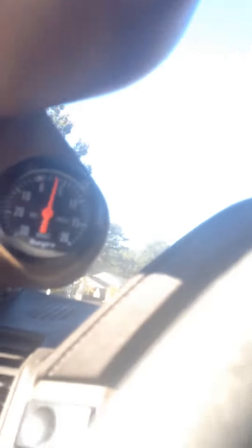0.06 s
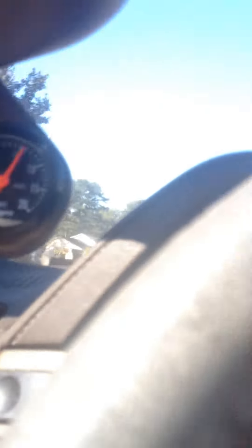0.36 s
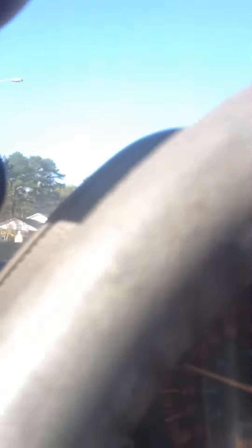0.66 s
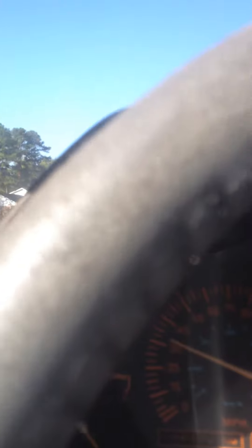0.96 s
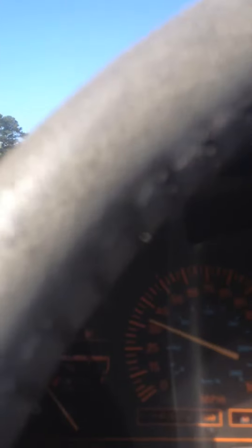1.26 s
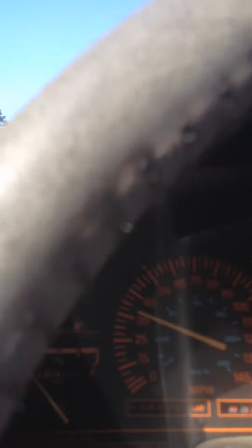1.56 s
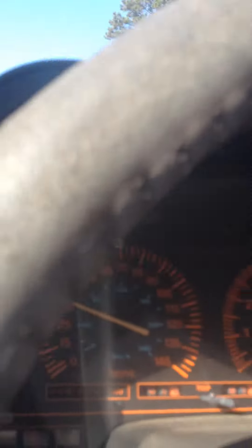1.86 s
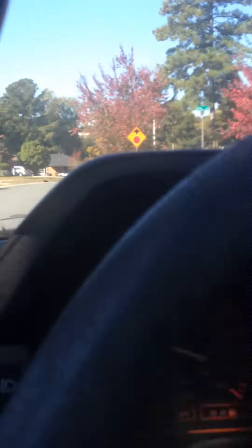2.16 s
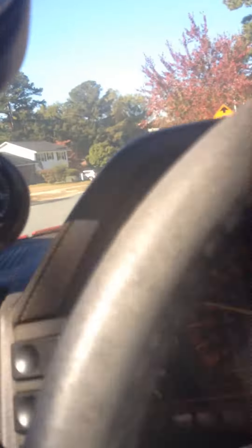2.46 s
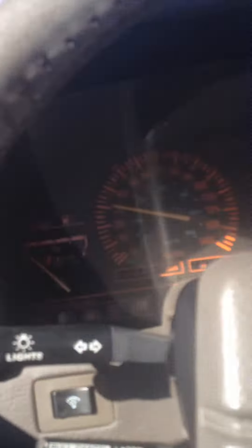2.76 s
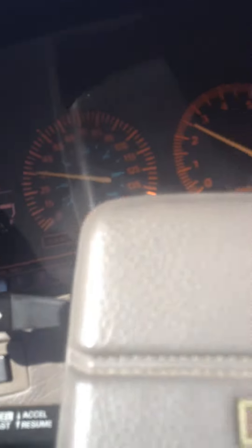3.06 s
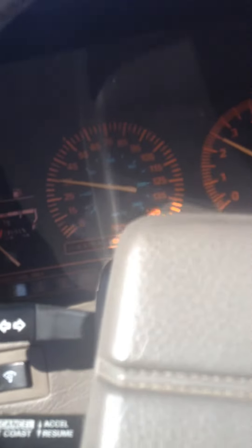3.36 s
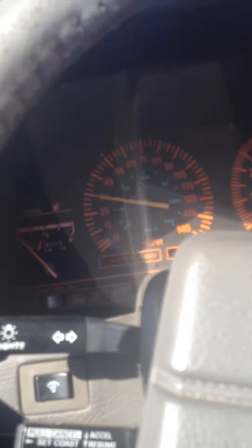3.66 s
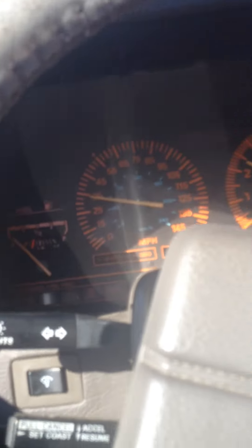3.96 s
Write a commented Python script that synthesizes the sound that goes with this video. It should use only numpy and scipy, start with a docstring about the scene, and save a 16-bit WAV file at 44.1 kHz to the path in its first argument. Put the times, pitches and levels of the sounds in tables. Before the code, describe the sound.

Heard inside the cabin, a turbocharged car engine accelerates briefly with a climbing whine, then lets off with a high, sinking whistle and a fading hiss. A lower drone and road rumble follow, with a few muffled bumps.

```python
"""Inside a turbocharged car. Under load, the engine's firing harmonics boom in the cabin while the
turbo whines upward with its shaft speed. At a gear change the blow-off valve vents with a shrill,
sinking whistle, a sharp click and a long hiss, and late firings thump in the exhaust. The car then
coasts on a lower drone over tyre rumble, with faint ticks; bumps ring the body's modes as dull knocks."""
import sys
import numpy as np
from scipy import signal
from scipy.io import wavfile

SR = 44100
rng = np.random.default_rng(int(sys.argv[2]) if len(sys.argv) > 2 else 0)


def persist_wave(psi):
    """Save psi, clipped to +-1, as 16-bit WAV."""
    counts = np.round(np.clip(psi, -1, 1) * 32767).astype(np.int16)
    wavfile.write(sys.argv[1], SR, np.atleast_2d(counts).T)


N = 176400
T = np.arange(N) / SR


def from_db(db):
    """Amplitude grows tenfold for every 20 dB."""
    return 10 ** (np.asarray(db) / 20)


def rms_one(x):
    """Normalisation to unit mean power."""
    return x / np.sqrt(np.mean(x ** 2) + 1e-20)


def in_time(rows):
    """Linear interpolation of each column of a curve at every sample."""
    times, *columns = np.transpose(rows)
    return [np.interp(T, times, column) for column in columns]


def at_hz(points, hz):
    """Interpolation of a spectrum on a log-frequency axis."""
    freqs, levels = np.transpose(points)
    return np.interp(np.log(hz), np.log(freqs), levels)


def swell(centre, half):
    """A Gaussian envelope, down to 1/e at `half` seconds from its centre."""
    return np.exp(-((T - centre) / half) ** 2)


def drift(rate_hz, step=20):
    """Low-passed noise, drawn every `step` samples, gives a random fluctuation of unit spread."""
    r = np.exp(-2 * np.pi * step * rate_hz / SR)
    slow = signal.lfilter([1], [1, -2 * r, r * r], rng.standard_normal(N // step + 2002))[2000:]
    return np.interp(np.arange(N) / step, np.arange(len(slow)), rms_one(slow))


def phase_of(hz):
    """Phase is the time integral of frequency."""
    return 2 * np.pi * np.cumsum(hz) / SR


def filtered(x, order, hz, kind):
    """A maximally flat filter attenuates what lies outside its passband."""
    return signal.sosfilt(signal.butter(order, hz, kind, fs=SR, output="sos"), x)


def breathy(hz, half_width_hz):
    """Turbulence driving a resonance gives narrow-band noise about its frequency; rms 1."""
    a, b = filtered(rng.standard_normal((2, N)), 3, half_width_hz, "low")
    phase = phase_of(np.broadcast_to(hz, N))
    return rms_one(a * np.cos(phase) + b * np.sin(phase))


def noise(spectrum, flicker_db):
    """Broadband noise as a sum of third-octave bands whose levels flicker independently; rms 1."""
    out, edges = 0, 20 * 2 ** (np.arange(30) / 3)
    white = rng.standard_normal((2, N + 8000))
    for k, (low, high) in enumerate(zip(edges, edges[1:])):
        band = filtered(white[k % 2], 3, [low, high], "band")[-N:]
        db = at_hz(spectrum, np.sqrt(low * high)) + flicker_db * drift(17.6, step=100)
        out += band * from_db(db)
    return rms_one(out)


def ring(force, hz, t60):
    """A damped mode answers each impulse with a sinusoid that falls 60 dB in t60 seconds."""
    r, w = from_db(-60 / (t60 * SR)), 2 * np.pi * hz / SR
    return signal.lfilter([.5, 0, -.5], [1, -2 * r * np.cos(w), r * r], force + 1e-18)


def engine():
    """Source and filter: firing harmonics sweep through the cabin's resonances; the floor hums below."""
    # engine speed: (time [s], firing rate [Hz])
    firing = [(0, 84.14), (.15, 86.95), (.55, 98.6), (.6, 95), (.665, 88.15), (.85, 80.94), (1.02, 71.6),
              (1.24, 63.43), (2.25, 61.51), (3.1, 58.56), (4, 55.9)]
    # engine effort: (time [s], level [dB], roughness [0-1])
    load = [(0, -11, 0.08), (.2, -11, 0.19), (.56, -8, 0.14), (.6, -12.5, 0.1), (.625, -24, 0.6),
            (.73, -30, 0.9), (.79, -20, 0.56), (.82, -21.5, .5), (.87, -15, 0.4), (.92, -23, 0.3),
            (1.08, -19, 0.07), (1.25, -24, 0.01), (2.1, -24.5, 0.34), (2.4, -22.5, 0.17), (4, -25, 0.03)]
    # cabin response: (frequency [Hz], gain [dB])
    cabin = [(90, -10.5), (120, -16), (145, -24.5), (168, 2.5), (195, -0.5), (215, -22.5), (255, -8.5),
             (295, -12.5), (350, -15), (480, -15.5), (600, -25.5), (1200, -36)]
    # floor hum: (time [s], level at the firing rate [dB], level at 4/3 of that rate [dB])
    floor_hum = [(0, -41, -28), (.45, -37.5, -39.5), (.7, -38, -28), (1, -38.5, -57), (1.25, -43.5, -64),
                 (4, -47.5, -55)]
    uneven_db, fall_db_per_octave = -27, 13
    hz, = in_time(firing)
    load_db, roughness = in_time(load)
    firing_db, shake_db = in_time(floor_hum)
    phase = phase_of(hz * (1 + .002 * drift(10)))
    hum = from_db(firing_db) * np.sin(phase) + from_db(shake_db) * np.sin(4 / 3 * phase)
    boom = 0
    for thirds in range(5, 37):
        order = thirds / 3
        db = at_hz(cabin, order * hz) - fall_db_per_octave * np.log2(max(order / 3, 1))
        if thirds % 3:   # uneven cylinders add weak lines between the harmonics
            db += uneven_db / (1 + order / 10)
        angle = order * phase + rng.uniform(0, 2 * np.pi)
        wobble = roughness * order / 4
        partial = (1 + wobble * drift(44)) * np.sin(angle) + wobble * drift(60) * np.cos(angle)
        boom += from_db(db) * partial
    return np.sqrt(2) * (filtered(from_db(load_db) * boom, 3, 85, "high") + hum)


def turbo():
    """A rotor sounds in proportion to its speed: a fluttering shaft whine, with blade tones far above."""
    # turbo spool: (time [s], shaft rate [Hz], whine level [dB])
    spool = [(0, 1490, -50), (.16, 1665, -43), (.3, 1830, -47), (.54, 2040, -46), (.68, 1910, -47),
             (.8, 1680, -43), (.9, 1520, -54), (1.25, 1100, -70)]
    # blade tones: (ratio to shaft rate, half-width [Hz], centre [s], half-length [s], level [dB])
    blade_tones = [(8.0, 650, 0.13, 0.11, -53), (5.62, 400, 0.21, 0.099, -54),
                   (5.97, 290, 0.44, 0.17, -50.5), (5.82, 550, 0.54, 0.065, -43)]
    hz, whine_db = in_time(spool)
    whine = from_db(whine_db) * (np.sin(phase_of(hz)) + .7 * breathy(hz, 35)) * (T < spool[-1][0])
    blades = sum(from_db(db) * swell(centre, half) * breathy(ratio * hz, width)
                 for ratio, width, centre, half, db in blade_tones)
    return whine + blades


def intake():
    """Turbulence in the rushing intake air radiates broadband noise."""
    # intake rush: (time [s], level [dB])
    rush = [(0, -31), (.35, -35), (.55, -30.5), (.62, -37), (.72, -44)]
    # its spectrum: (frequency [Hz], relative density [dB])
    spectrum = [(60, -1), (300, 14), (600, 18.5), (1500, -16), (2500, -3), (4300, -10.5), (5300, -14.5),
                (8000, -13.5), (11000, -11), (13500, -13), (15000, -14)]
    return from_db(in_time(rush)[0]) * noise(spectrum, flicker_db=1.0) * (T < rush[-1][0])


def road():
    """Random excitation: road and wind give a rumble coloured by tyre and panel resonances."""
    # rumble: (time [s], level [dB])
    levels = [(0, -30.5), (.8, -27), (1.1, -30.5), (2.4, -29), (3.2, -31.5), (4, -32)]
    # its spectrum: (frequency [Hz], relative density [dB])
    spectrum = [(25, -31.5), (75, -12), (115, -8), (170, 5), (240, -2), (330, -6.5), (500, -6), (850, -9.5),
                (1800, -19), (2300, -25.5), (3200, -32.5), (5300, -39.5), (15000, -54.5)]
    # tyre and panel resonances: (frequency [Hz], half-width [Hz], level re rumble [dB])
    resonances = [(903, 79, -17.5), (1752, 139, -19)]
    rumble = noise(spectrum, flicker_db=1.26)
    ringing = sum(from_db(db) * breathy(hz, width) for hz, width, db in resonances)
    return from_db(in_time(levels)[0]) * (rumble + ringing)


def air():
    """Flow noise: a faint hiss that peaks as coasting begins."""
    # airy hiss: (time [s], level [dB])
    levels = [(0, -69), (1, -43.5), (1.5, -52.5), (2.4, -60), (4, -76)]
    # its spectrum: (frequency [Hz], relative density [dB])
    spectrum = [(1000, -6.5), (2500, 2), (4300, 7.5), (5200, -9.5), (6500, -0.5), (10000, -8.5),
                (15000, -14)]
    return from_db(in_time(levels)[0]) * noise(spectrum, flicker_db=1.9)


def blow_off():
    """A venting jet: the valve's whistle sinks as pressure falls, and its hiss lingers and dulls."""
    # valve whistle: (time [s], frequency [Hz], level [dB])
    valve = [(.58, 6900, -70), (.612, 6800, -33), (.638, 6680, -30.5), (.662, 6530, -22.5),
             (.71, 6410, -25), (.778, 6320, -28.5), (.79, 6320, -23.5), (.798, 6320, -32), (.84, 6270, -38),
             (.92, 6200, -75)]
    # pipe resonance: (ratio to the whistle, half-width [Hz], initial level re hiss [dB])
    pipe_modes = [(0.99, 420, 1)]
    # vent hiss: (frequency [Hz], relative density [dB])
    spectrum = [(800, -13.5), (1500, 2.5), (2600, 8), (4200, 5.5), (7000, 3.5), (9500, 5), (13000, 4),
                (15000, 0)]
    open_s, attack_s, hold_s, flow_db = .567, .06, .36, -36.5
    flow_fall, pipe_fall, treble_fall = 37, 16, 21   # [dB/s]
    hz, whistle_db = in_time(valve)
    phase = phase_of(hz + 35 * drift(150, step=4))
    tone = np.sqrt(2) * np.sin(phase) * rms_one(1 + .45 * drift(140))
    skirt = from_db(-9) * breathy(hz, 300)
    octave = from_db(-22) * breathy(2 * hz, 450)
    whistle = from_db(whistle_db) * (T < valve[-1][0]) * (tone + skirt + octave)
    age = np.maximum(T - open_s, 0)
    flow = np.minimum(age / attack_s, 1) * from_db(flow_db - flow_fall * np.maximum(age - hold_s, 0))
    pipe = sum(from_db(db) * breathy(ratio * hz, width) for ratio, width, db in pipe_modes)
    hiss = noise(spectrum, flicker_db=1.1)
    dull = signal.sosfiltfilt(signal.butter(2, 8000, fs=SR, output="sos"), hiss)
    treble = (hiss - dull) * from_db(-treble_fall * age)
    return whistle + flow * (pipe * from_db(-pipe_fall * age) + dull + treble)


def side_whistles():
    """The valve's weaker resonances glide down with the pressure; a narrow band of hiss lingers."""
    # whistles: (frequency at the centre [Hz], centre [s], half-length [s], level [dB])
    whistles = [(6850, 0.704, .022, -30.5), (6930, .82, 0.15, -39.5), (5940, .785, .06, -39),
                (6200, .655, 0.037, -41)]
    # last thin hiss: (frequency [Hz], half-width [Hz], centre [s], half-length [s], level [dB])
    last_hiss = (6450, 350, 1.25, 0.7, -59)
    sink_hz_per_s = 2300
    glides = sum(from_db(db) * swell(centre, half) * breathy(hz - sink_hz_per_s * (T - centre), 140)
                 for hz, centre, half, db in whistles)
    hz, width, centre, half, db = last_hiss
    return glides + from_db(db) * swell(centre, half) * breathy(hz, width)


def burble():
    """Impulse response: each late firing after lift-off rings the exhaust's resonance briefly."""
    # late firings: (time [s], relative level [dB])
    pops = [(0.646, -12), (0.751, -14), (.776, -6.5), (.863, -12)]
    exhaust_hz, rise_s, t60_s = 169.7, .00094, .072
    out = 0
    for start, db in pops:
        age = np.maximum(T - start, 0)
        envelope = from_db(db - 60 * age / t60_s) * (1 - np.exp(-age / rise_s))
        out -= envelope * np.sin(2 * np.pi * exhaust_hz * age)
    return filtered(out, 2, exhaust_hz / 2, "high")


def ticks():
    """Broadband transients: one sharp click during the valve's whistle, then faint ticks while coasting."""
    # short bright ticks: (time [s], relative level [dB])
    onsets = [(0.792, -17), (1.5449, -28.5), (1.5783, -28.5), (1.78, -27.5), (2.0503, -31.5),
              (2.3935, -31.5), (2.7473, -32.5)]
    # their spectrum: (frequency [Hz], relative density [dB])
    spectrum = [(4000, -25), (6200, 5), (10000, -5.5)]
    decay_s, gain_db = .0014, -8.5
    envelope = sum(from_db(db + gain_db) * (T >= start) * np.exp(-np.abs(T - start) / decay_s)
                   for start, db in onsets)
    return envelope * noise(spectrum, flicker_db=0)


def bumps():
    """Modal response: soft bumps and rattling panels drive the same body modes, muffled by the trim."""
    # road bumps: (time [s], relative level [dB], bandwidth [Hz])
    jolts = [(2.02, -6.5, 500), (2.073, -8, 602.4), (2.162, -0.5, 383.7), (2.435, -6, 900),
             (2.574, -11.5, 603), (2.747, -2.5, 300), (2.767, -10, 500), (2.809, -4, 453.7),
             (2.818, -7, 198), (2.837, -2.5, 400), (2.899, -14, 905), (2.954, -3, 246), (2.973, -3.5, 500),
             (3.017, -4.5, 280)]
    # body modes: (frequency [Hz], gain [dB], 60 dB decay time [s])
    body_modes = [(132, -8.5, 0.07), (230.8, -0.5, 0.052), (318, 9.5, 0.017), (428, -1.5, 0.018),
                  (750, -0.5, .018)]
    # loose panels shaking: (centre [s], half-length [s], relative level [dB])
    rattles = [(2.117, 0.12, -30), (2.447, 0.017, -22.5), (2.8, 0.044, -25), (2.905, 0.028, -21.5)]
    push_db, contacts_per_s = -4, 220
    pushes = 0
    for time, db, hz in jolts:
        unit_pulse = np.sqrt(np.pi) * hz / SR * swell(time, 1 / (np.pi * hz))
        pushes += from_db(db + push_db) * unit_pulse
    knocks = sum(from_db(db) * ring(pushes, hz, t60) for hz, db, t60 in body_modes) / 2
    shaking = sum(from_db(db) * swell(centre, half) for centre, half, db in rattles)
    contacts = rng.random(N) < contacts_per_s / SR
    rattle = sum(from_db(db) * ring(contacts * rng.uniform(-1.17, 1, N), hz, t60)
                 for hz, db, t60 in body_modes)
    return filtered(knocks + shaking * rms_one(rattle), 3, [100, 850], "band")


def scene():
    """Superposition: the pressures of all sources add at the driver's seat."""
    powertrain = engine() + turbo() + intake() + blow_off() + side_whistles() + burble()
    ride = road() + air() + bumps()
    return (powertrain + ride + ticks())[None]


def record(dry):
    """Band limiting: a steep elliptic low-pass removes the highest treble."""
    cutoff_hz = 15300
    return signal.sosfilt(signal.ellip(12, .1, 90, cutoff_hz, fs=SR, output="sos"), dry)


dry = scene()
out = record(dry)
persist_wave(out)
```